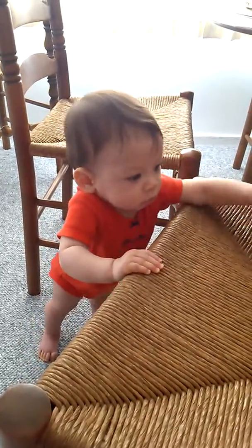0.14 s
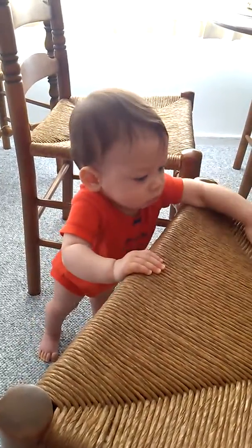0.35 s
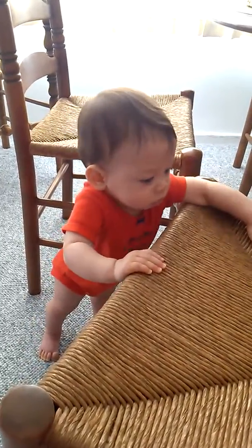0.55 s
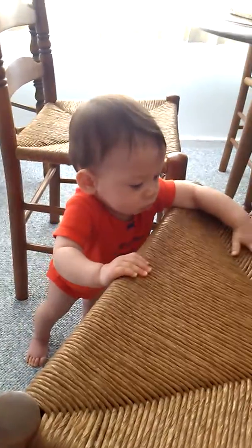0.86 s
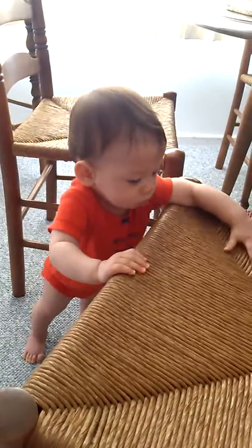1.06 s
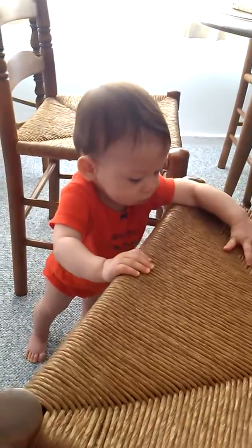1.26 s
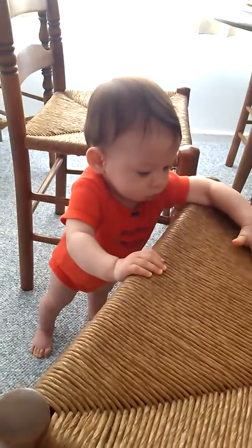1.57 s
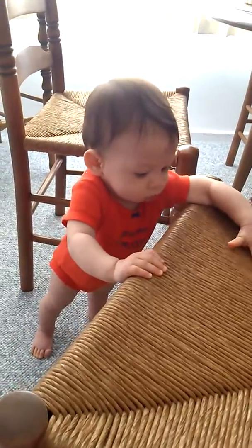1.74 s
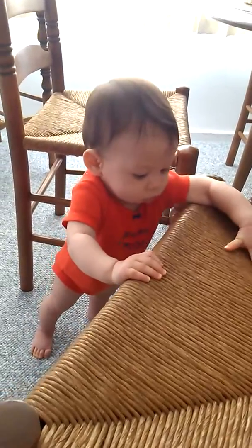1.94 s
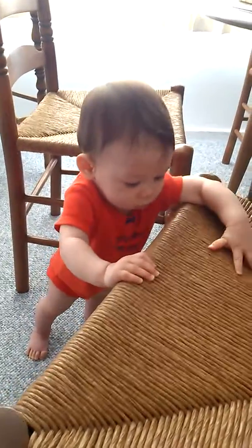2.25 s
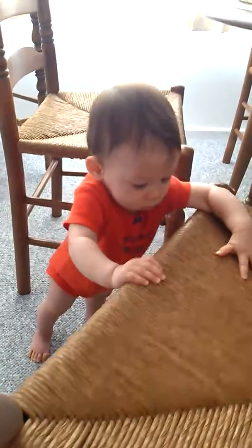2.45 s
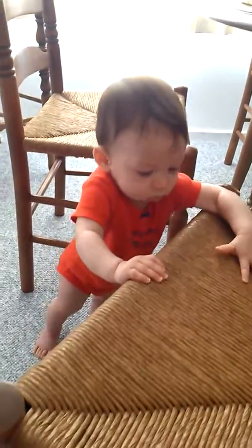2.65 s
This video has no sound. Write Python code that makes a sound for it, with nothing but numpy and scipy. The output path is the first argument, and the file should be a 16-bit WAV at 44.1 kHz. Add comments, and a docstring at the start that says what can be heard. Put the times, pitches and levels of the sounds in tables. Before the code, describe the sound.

A baby's hand pats a woven straw seat at 0.23 seconds, fingers then palm, a dry slap with a brief hollow ring. Tiny soft taps follow at 0.4 to 0.6, then light brushing and crisp strand ticks, strongest near 0.86. Dull low bumps sound around 1.1 to 1.45. A knocking scrape crosses the weave at 2.4 to 2.55, then faint brushing. Quiet room noise and hum, short echo.

```python
"""Over faint room noise and hum a baby pats a woven rush seat early on; brushing and ticking mostly follow.
The pat, fingers then palm, is short noise bursts plus a hollow pulse, and rings the modes of the seat.
Strands tick as filtered bursts; brushing, and a longer scrape near the end, are friction by random grains.
Dull low bumps, made of swelling filtered noise, sound before the scrape."""
import sys
import numpy as np
from scipy import signal
from scipy.fft import rfft, irfft
from scipy.io import wavfile

SR = 44100
rng = np.random.default_rng(int(sys.argv[2]) if len(sys.argv) > 2 else 0)


def materialize(psi):
    """Save the field psi as 16-bit PCM at rate SR to the path in sys.argv[1].

    A 1-D psi becomes a single channel; in a 2-D psi each row is a channel.
    """
    bounded = np.clip(np.atleast_2d(psi).T, -1, 1)
    quanta = np.round(bounded * 32767).astype(np.int16)
    wavfile.write(sys.argv[1], SR, quanta)


N = 125685


def amp(db):
    """Level law: decibels to amplitude gain."""
    return 10 ** (np.asarray(db) / 20)


def unit(x):
    """Normalisation: scales a signal to rms 1."""
    return x / np.sqrt(np.mean(x ** 2) + 1e-20)


def read(points, hz):
    """Interpolation of a table along a logarithmic frequency axis."""
    f, value = np.transpose(points)
    return np.interp(np.log(hz + 1), np.log(f + 1), value)


def add(mix, s, sound):
    """Superposition: adds a sound into the mix at time s."""
    part = mix[max(round(s * SR), 0):][:len(sound)]
    part += sound[:len(part)]


def colour(x, points, size=8192):
    """Minimum-phase filtering: the log gain fixes the phase, through its Hilbert transform."""
    hz = abs(np.fft.fftfreq(size, 1 / SR))
    log_gain = np.log(amp(read(points, hz)))
    response = np.exp(np.conj(signal.hilbert(log_gain)))
    impulse = np.fft.ifft(response).real[:size // 2]
    return signal.fftconvolve(x, impulse)[:len(x)]


def seconds(size=16384):
    """Time axis of one event."""
    return np.arange(size) / SR


def swell(t, rise_s):
    """Critically damped pulse: rises to 1 at rise_s, then dies away."""
    return t / rise_s * np.exp(1 - t / rise_s)


def crunches(times, levels_db, decay_s):
    """Impulsive contact: each is a short crunch of fibres with an even spectrum and set energy."""
    out, t = np.zeros(N), seconds(size=2048)
    for s, db in zip(times, levels_db):
        noise = rng.standard_normal(len(t)) * np.exp(-t / decay_s)
        spectrum = rfft(noise)
        flat = irfft(spectrum / (abs(spectrum) + 1e-12))  # keeps only the phase
        burst = flat * np.exp(-(t / (10 * decay_s)) ** 2)
        add(out, s, amp(db) * burst / np.linalg.norm(burst))
    return out


# Room noise spectrum: (frequency [Hz], relative density [dB per Hz])
AIR_SPECTRUM = [(20, -38.5), (38, -28.5), (58, -1.5), (85, 0.5), (150, 0), (280, 0), (500, -3.5),
                (1000, -7.5), (1600, -9.5), (2600, -9), (3600, -15), (5000, -12.5), (6700, -19.5),
                (9500, -28.5)]
AIR_DB, HUM_HZ, HUM_DB = -57, 59, -68.5  # rms levels


def air():
    """Stationary noise of shaped spectral density, with a steady low sine as hum."""
    noise = unit(colour(rng.standard_normal(N), AIR_SPECTRUM))
    hum = np.sqrt(2) * np.sin(2 * np.pi * HUM_HZ * seconds(size=N))
    return amp(AIR_DB) * noise + amp(HUM_DB) * hum


GRAINS_PER_S, GRAIN_SPREAD_DB = 2600, 3.5


def friction():
    """Granular friction: dense tiny slips of skin on straw at random times, a few of them large."""
    size = amp(GRAIN_SPREAD_DB * np.minimum(rng.exponential(1, N), 4))
    slips = rng.random(N) < GRAINS_PER_S / SR
    return size * rng.choice([-1, 1], N) * slips


# Light finger strokes: (time of peak [s], rise constant [s], fall constant [s], peak level [dB])
STROKE_EVENTS = [(.04, .04, .04, -85), (.72, 0.021, 0.032, -58.5), (.81, 0.021, 0.055, -60),
                 (.873, 0.014, 0.085, -57.5), (.97, 0.17, 0.16, -55.5), (1.575, 0.071, .08, -50),
                 (1.90, 0.089, .07, -59), (2.158, 0.035, 0.017, -49), (2.629, 0.044, 0.026, -50.5),
                 (2.765, 0.032, 0.032, -55.5), (2.83, 0.059, 0.041, -54)]
# Colour of brushed straw: (frequency [Hz], gain [dB])
BRUSH_COLOUR = [(60, -22), (400, 3), (1100, 3), (1800, 2), (2700, 6.5), (3600, -4), (5200, 0), (6700, -3.5),
                (9500, -15.5)]


def strokes():
    """Friction under a varying hand: fingers brush lightly, and overlapping strokes add in power."""
    t = seconds(size=N)
    power = np.zeros(N)
    for s, rise, fall, db in STROKE_EVENTS:
        distance = np.maximum((s - t) / rise, (t - s) / fall)
        power += amp(db) ** 2 * np.exp(-2 * distance)
    return np.sqrt(power) * unit(colour(friction(), BRUSH_COLOUR))


# Ticks of single strands: (time [s], snap level [dB], body level [dB])
TICK_EVENTS = [(0.031, -35, -33), (.670, -27.5, -52), (.7885, -26.5, -30), (.859, -11.5, -19),
               (.868, -26, -41), (.884, -22.5, -46), (0.9444, -27.5, -56), (.958, -31, -21),
               (.979, -36, -45), (1.0214, -24.5, -46), (1.068, -26.5, -24), (1.235, -32.5, -34),
               (1.2654, -24.5, -31), (1.412, -29.5, -31), (1.5678, -24, -35), (1.575, -33, -34),
               (1.599, -24.5, -40), (1.636, -25, -43), (1.683, -22.5, -25), (1.813, -45, -24),
               (1.834, -31, -16), (1.928, -30, -44), (1.94, -27, -25), (1.962, -32, -20.5),
               (2.090, -39, -14.5), (2.094, -35, -19), (2.109, -28, -37), (2.234, -27.5, -40),
               (2.253, -30, -28), (2.3272, -24.5, -15), (2.4447, -16, -35), (2.453, -13, -23),
               (2.615, -22.5, -30), (2.7341, -22, -28), (2.803, -26.5, -30), (2.821, -38, -33)]
# Bright snap of a strand: (frequency [Hz], gain [dB])
SNAP_COLOUR = [(100, -21), (1500, -4), (3500, -3.5), (5000, 4.5), (6800, 0.5), (9500, -7)]
# Woody body of a strand, heard also in the cracks of the scrape: (frequency [Hz], gain [dB])
BODY_COLOUR = [(100, -28), (1000, -13.5), (1400, -10), (1800, 7.5), (2300, -3.5), (2800, 7.5), (3100, 5),
               (3500, -13.5), (5000, -7), (9000, -40)]
TICK_DECAY_S = 0.002


def ticks():
    """Elastic release: strands snap back under the fingertips, each a bright snap and a woody body."""
    times, snap_db, body_db = np.transpose(TICK_EVENTS)
    snaps = colour(crunches(times, snap_db, TICK_DECAY_S), SNAP_COLOUR)
    bodies = colour(crunches(times, body_db, TICK_DECAY_S), BODY_COLOUR)
    return snaps + bodies


# Small soft taps: (time [s], level [dB])
TAP_EVENTS = [(.061, -27), (0.3888, -15.5), (0.4514, -17.5), (0.5891, -15)]
# Narrow colour of the taps: (frequency [Hz], gain [dB])
TAP_COLOUR = [(100, -29), (1200, -3), (1600, -6), (2050, 6), (2500, 4), (2900, -12), (3500, -31),
              (9000, -49)]
TAP_DECAY_S = 0.002


def taps():
    """Band-limited impact: soft little taps confined to a narrow range of frequency."""
    return colour(crunches(*np.transpose(TAP_EVENTS), TAP_DECAY_S), TAP_COLOUR)


# Contacts of the pat, fingers, palm, then the hand settling:
# (time [s], slap level [dB], hollow push level [dB], seat ring level [dB])
PAT_CONTACTS = [(.2348, 0, -27, -48), (0.2438, -6.5, -11.5, -40), (0.2529, -14, -35, -55),
                (0.2583, -13.5, -44, -60)]
# Colour of skin slapping straw: (frequency [Hz], gain [dB])
SLAP_COLOUR = [(60, -19), (300, 2.5), (750, 7.5), (1550, -1.5), (1850, 4), (2300, -0.5), (3000, 3),
               (3750, -6.5), (4700, 4.5), (5500, 1.5), (6200, -12.5), (7000, -7.5), (9500, -18)]
SLAP_DECAY_S, PUSH_HZ, PUSH_RISE_S = 0.0035, 1050, 0.00091


def pat():
    """Impact excitation: fingers slap straw as noise; a hollow push, most at the palm, is a pulsed sine."""
    times, slap_db, _, _ = np.transpose(PAT_CONTACTS)
    out = colour(crunches(times, slap_db, SLAP_DECAY_S), SLAP_COLOUR)
    t = seconds()
    push = 0.47 * swell(t, PUSH_RISE_S) * np.sin(2 * np.pi * PUSH_HZ * t)
    for s, _, push_db, _ in PAT_CONTACTS:
        add(out, s, amp(push_db) * push)
    return out


# Modes of the seat: (frequency [Hz], level [dB], time to fall 60 dB [s])
SEAT_MODES = [(122.5, -3.5, 0.12), (218, -9.5, 0.24), (313, -1, 0.14), (537, 7.5, 0.098), (661, 2, 0.098),
              (791, -7, 0.19), (902, -8, 0.084), (1016, -7.5, 0.11), (1220, -7.5, 0.19), (1795, -10, 0.076),
              (2615, -9.5, 0.075), (2880, -10, 0.054)]
SEAT_RISE_S = 0.0012  # time constant of the onset


def seat():
    """Modal resonance: pat and scraping fingers ring the seat and its frame as a sum of decaying sines."""
    out, t = np.zeros(N), seconds()
    ring = np.zeros(len(t))
    for hz, db, t60 in SEAT_MODES:
        ring += amp(db - 60 * t / t60) * np.sin(2 * np.pi * hz * t)
    ring *= 1 - np.exp(-t / SEAT_RISE_S)
    for s, _, _, ring_db in PAT_CONTACTS + RIDGE_BUMPS:
        add(out, s, amp(ring_db) * ring)
    return out


# Dull low bumps: (time [s], level [dB])
THUD_EVENTS = [(1.106, -50.5), (1.145, -56.5), (1.215, -60), (1.275, -55), (1.325, -49), (1.385, -55.5),
               (1.45, -59)]
# Colour of the low bumps: (frequency [Hz], gain [dB])
THUD_COLOUR = [(30, -35), (48, -20), (68, 7), (100, 1), (135, -8), (180, -2), (280, -11), (450, -27),
               (1500, -50)]
THUD_RISE_S = 0.018


def thuds():
    """Amplitude-modulated low noise: soft bumps, as of weight shifting on carpet."""
    level = np.zeros(N)
    for s, db in THUD_EVENTS:
        add(level, s, amp(db) * swell(seconds(), THUD_RISE_S))
    return level * unit(colour(rng.standard_normal(N), THUD_COLOUR))


# Course of the long scrape: (time [s], level [dB])
SCRAPE_LEVEL = [(2.33, -57), (2.36, -52), (2.393, -43), (2.429, -46.5), (2.455, -35.5), (2.465, -44.5),
                (2.477, -35.5), (2.499, -44), (2.54, -44), (2.575, -50.5), (2.61, -61), (2.702, -60.5)]
# Colour of the scrape: (frequency [Hz], gain [dB])
RASP_COLOUR = [(60, -11.5), (200, -2.5), (380, 3.5), (750, -6.5), (1050, -1), (1700, 0.5), (2800, 3.5),
               (3600, -8), (4600, 1), (6400, -2.5), (9500, -14)]
# Fingers bumping over ridges of the weave:
# (time [s], knock level [dB], crack level [dB], seat ring level [dB])
RIDGE_BUMPS = [(2.394, -15.5, -20, -61), (2.4081, -8, -9, -62), (2.4105, -7.5, -13, -71),
               (2.470, -6, -7.5, -42.5), (2.472, -7.5, -8, -62), (2.481, -5, -7.5, -46.5),
               (2.5055, -8.5, -24, -61), (2.512, -7, -18, -49), (2.5525, -17, -15, -71),
               (2.558, -7, -17, -59)]
# Colour of the knocks: (frequency [Hz], gain [dB])
KNOCK_COLOUR = [(60, -13), (200, 0), (340, 8.5), (560, 1), (750, 5), (1050, -18), (2000, -15), (5000, -12),
                (9500, -22)]
BUMP_DECAY_S = 0.0036


def scrape():
    """Friction with impacts: the hand drags across the seat and knocks over the ridges of its weave."""
    level = amp(np.interp(seconds(size=N), *np.transpose(SCRAPE_LEVEL), left=-120, right=-120))
    rasp = level * unit(colour(friction(), RASP_COLOUR))
    times, knock_db, crack_db, _ = np.transpose(RIDGE_BUMPS)
    knocks = colour(crunches(times, knock_db, BUMP_DECAY_S), KNOCK_COLOUR)
    cracks = colour(crunches(times, crack_db, BUMP_DECAY_S), BODY_COLOUR)
    return rasp + knocks + cracks


# Room decay: (frequency [Hz], time to fall 60 dB [s])
ROOM_DECAY = [(100, 0.24), (1000, 0.21), (5000, 0.19), (9000, 0.16)]
ROOM_DB, EARLY_DB, EARLY_S = -17.5, -14, 0.022  # tail level, early level, end of the early part


def room(x):
    """Reverberation: sparse early reflections from nearby furniture, and a short tail of decaying noise."""
    t = seconds()
    hz, at, z = signal.stft(rng.standard_normal(len(t)), SR, nperseg=256)
    decay = amp(-60 * at / read(ROOM_DECAY, hz)[:, None])
    tail = signal.istft(z * decay, SR, nperseg=256)[1][:len(t)] * (t > 0.008)
    sparse = rng.standard_normal(len(t)) * (rng.random(len(t)) < 0.04)
    early = sparse * (t > 0.006) * (t < EARLY_S)
    echo = amp(ROOM_DB) * tail / np.linalg.norm(tail)
    echo += amp(EARLY_DB) * early / np.linalg.norm(early)
    return x + signal.fftconvolve(x, echo)[:N]


def scene():
    """Superposition: hand and seat are heard with the room's echo; low bumps and room noise add directly."""
    contacts = strokes() + ticks() + taps() + pat() + seat() + scrape()
    return (room(contacts) + thuds() + air())[None]


# Microphone colour: (frequency [Hz], gain [dB])
MIC_COLOUR = [(20, 1.5), (6800, 2), (7400, -4.5), (8000, -16.5), (8700, -8), (9400, -11.5), (10000, -23)]
EDGE_HZ = 10050


def record(dry):
    """Linear filtering: microphone colour, then a linear-phase low-pass as the band limit."""
    edge = signal.firwin(401, EDGE_HZ, window=("kaiser", 8), fs=SR)
    return signal.fftconvolve(colour(dry[0], MIC_COLOUR), edge, "same")[None]


dry = scene()
out = record(dry)
materialize(out)
```